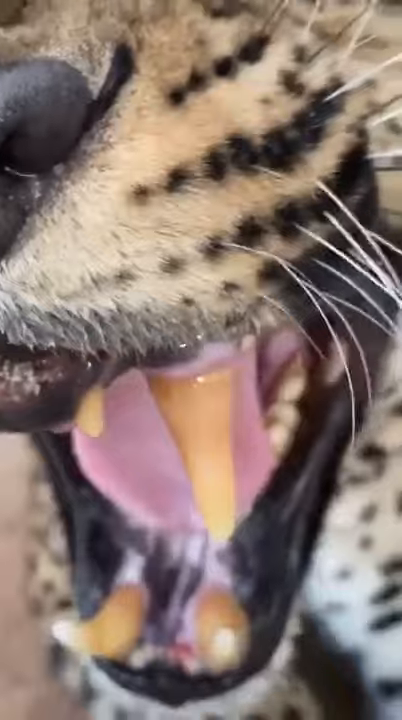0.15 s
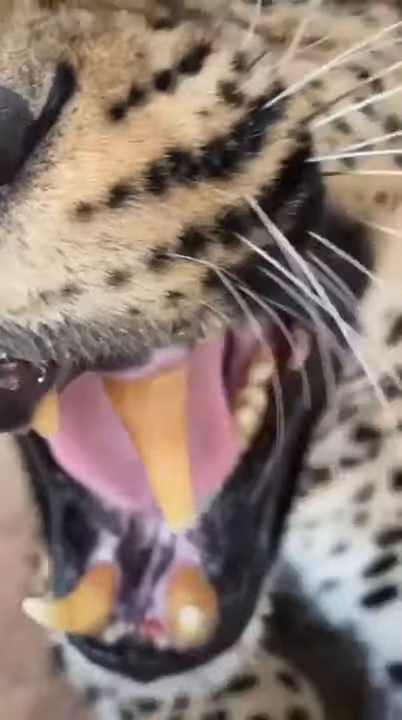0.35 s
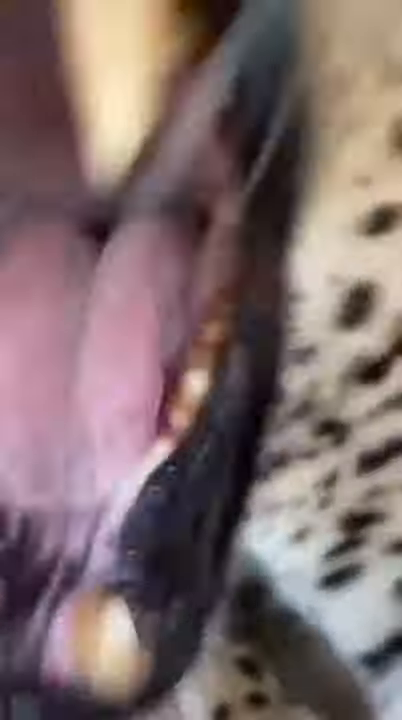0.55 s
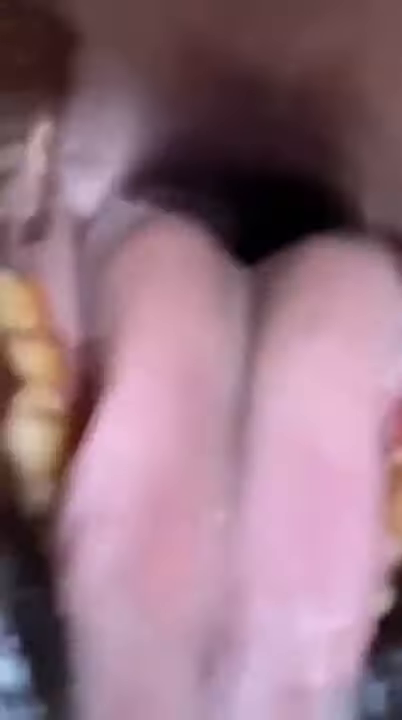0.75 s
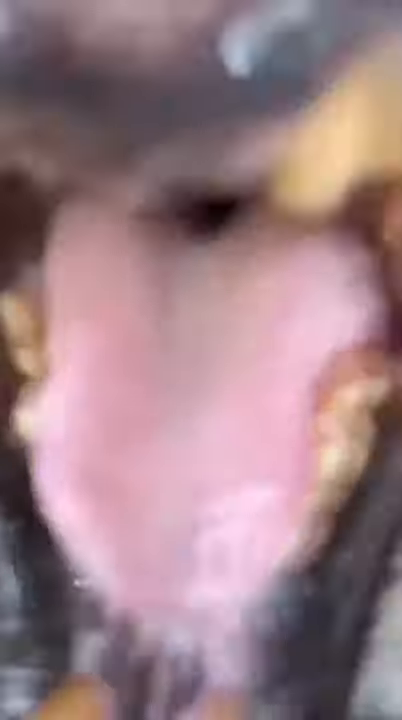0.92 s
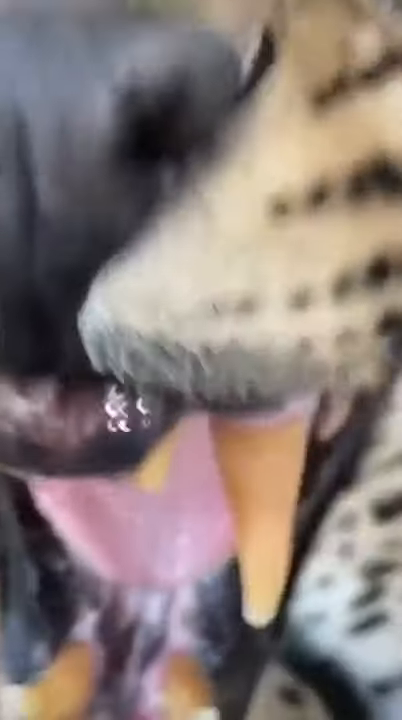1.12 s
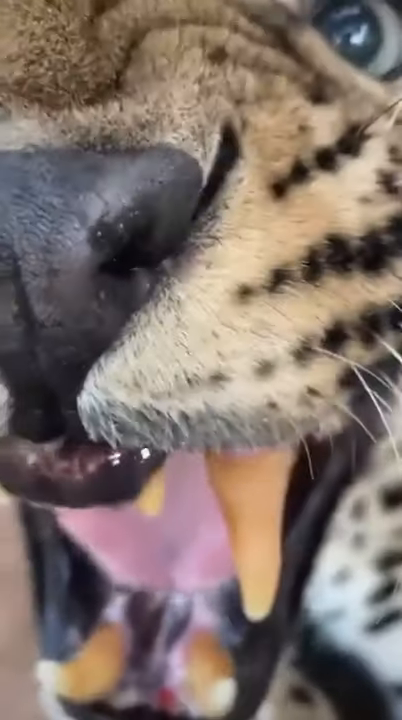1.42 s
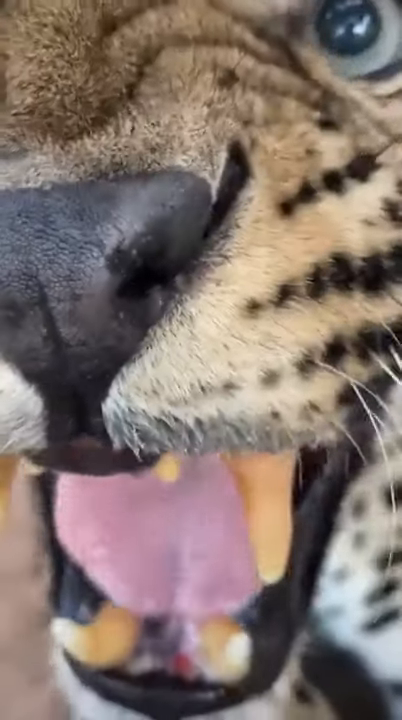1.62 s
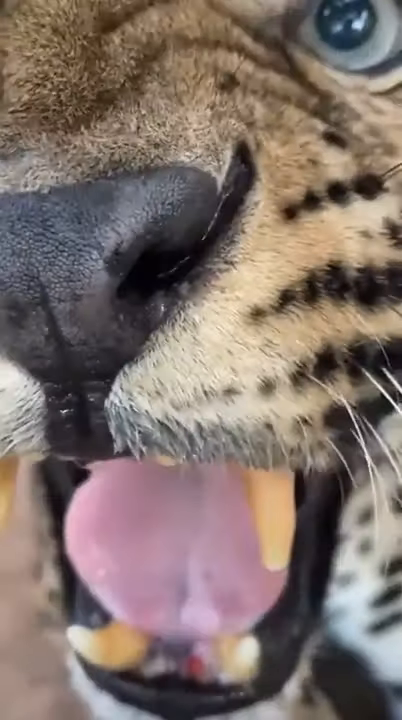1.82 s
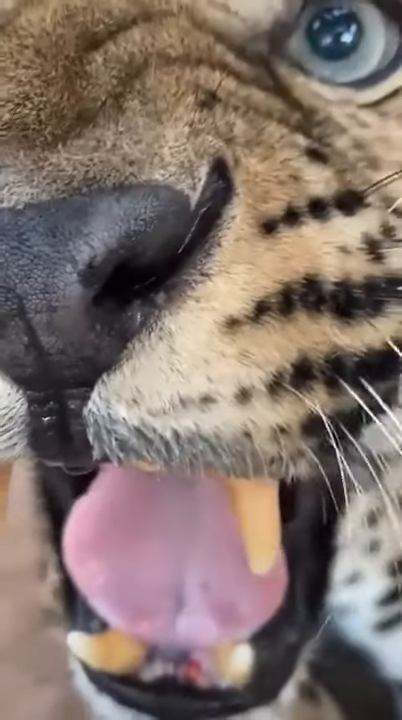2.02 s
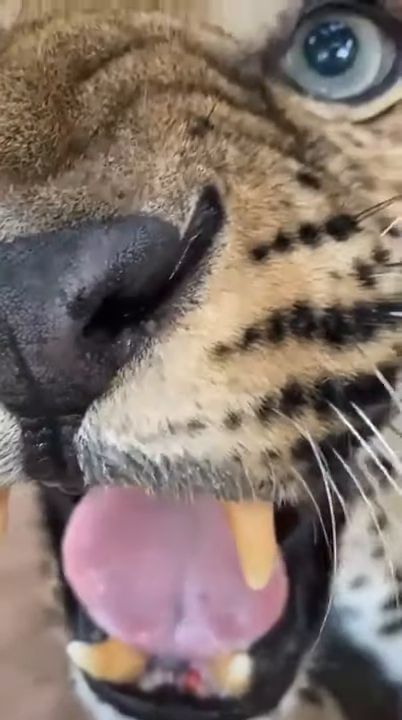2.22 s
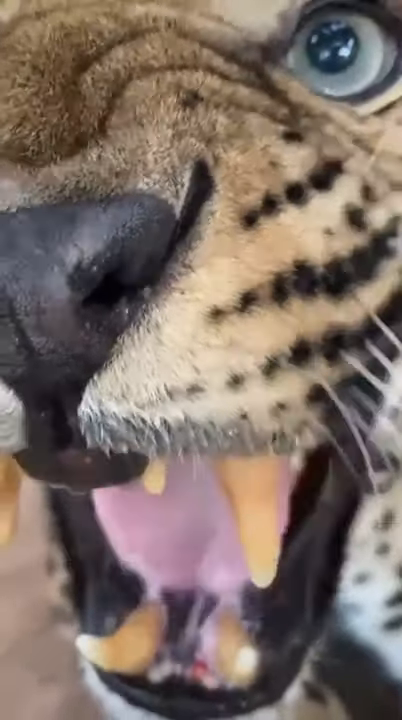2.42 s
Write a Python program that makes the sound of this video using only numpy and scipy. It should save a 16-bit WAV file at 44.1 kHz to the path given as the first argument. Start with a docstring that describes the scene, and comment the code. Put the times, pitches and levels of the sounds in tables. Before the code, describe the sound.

A leopard growls in a low, fluttering rumble right by the microphone, then bursts into a loud, hissing snarl. The growl fades, and the cat draws a wet, rasping breath before growling softly again in still air.

```python
"""A leopard growls close by, bursts into a snarling roar, sinks back, rasps on the in-draw, growls again.
Its slack vocal folds flap 14-45 times a second: each flap thumps the chest, rings the throat and slaps a
puff of turbulent air into the mouth resonances, while air hisses past the teeth. Indrawn air rushes and
gargles, saliva crackles. Faint reflections and still air lie behind."""
import sys
import numpy as np
from scipy import signal
from scipy.fft import rfft, irfft
from scipy.io import wavfile
from scipy.ndimage import uniform_filter1d

SR = 44100
rng = np.random.default_rng(int(sys.argv[2]) if len(sys.argv) > 2 else 0)


def put_to_file(sound):
    """Save the sound as 16-bit audio at rate SR, in the file named by the first command-line argument."""
    columns = np.atleast_2d(sound).T  # one column per channel
    safe = np.clip(columns, -1, 1)
    whole_steps = np.round(safe * 32767)
    wavfile.write(sys.argv[1], SR, whole_steps.astype(np.int16))


N = 112454

# still air spectrum: f/Hz, level/dB
FLOOR = [(25, -15), (90, 2.5), (280, 4), (400, -27.5), (700, -25), (1300, -30), (2500, -41), (12000, -56)]
# clearest saliva pops: t/s, level/dB
SALIVA_POPS = [(1.72, -27), (1.844, -18), (1.888, -16), (1.902, -15), (1.945, -17), (2.023, -19),
               (2.036, -20), (2.271, -21)]
# saliva resonances: f/Hz
SALIVA_HZ = [700, 1300, 1700, 3400, 4500, 5600, 7800]
# in-draw envelope: t/s, level/dB
DRAW_LEVEL = [(1.712, -84), (1.721, -41), (1.801, -38), (1.9, -33.5), (2.1, -37), (2.299, -41.5),
              (2.336, -54.5), (2.359, -91)]
# in-draw spectrum: f/Hz, level/dB
DRAW_SPECTRUM = [(30, -23.5), (65, 4.5), (110, 8.5), (210, -3), (310, -11), (430, -13), (600, -34),
                 (850, -31.5), (1250, -18), (2000, -30), (4000, -39), (10000, -44)]
# teeth hiss spectrum: f/Hz, level/dB
HISS_SPECTRUM = [(1500, -4), (3500, -3.5), (4500, 1), (5100, 2.5), (6500, 3.5), (9000, 0.5), (10500, -9.5),
                 (12000, -9), (12900, -3.5), (14000, -50)]
# brief pitched sounds (squeals, soft throat notes, a ringing saliva pop): t/s, f/Hz, level/dB, half-length/s
BRIEF_TONES = [(0.405, 4480, -48.5, 0.0055), (.628, 488, -19, 0.0032), (0.642, 464, -21.5, 0.0037),
               (2.511, 1596, -55.5, 0.0059), (0.593, 1222, -25, 0.0035), (.602, 2080, -26.5, 0.0022),
               (.606, 1167, -22.5, 0.0032), (0.652, 1202, -21, 0.0047), (0.672, 1350, -24, 0.0024),
               (1.891, 440, -32, 0.0032), (1.888, 1600, -41, 0.0025), (2.391, 268, -41.5, 0.0057),
               (2.411, 250, -46.5, 0.0061), (2.478, 176, -41, 0.0064), (2.516, 152, -38, 0.0068)]
# vocal fold flap rate: t/s, f/Hz
FLAP_HZ = [(0.0, 28.58), (0.1, 29.03), (0.35, 29.06), (0.48, 31.76), (0.57, 45.28), (0.76, 44.04),
           (1.0, 33.17), (1.16, 29.04), (1.36, 28.05), (1.5, 24.68), (1.68, 13.57), (1.76, 24.73),
           (1.87, 22.92), (2.01, 28.51), (2.1, 22.47), (2.21, 27.51), (2.36, 19.77), (2.52, 28.87)]
# voice strength before each layer's gain: t/s, chest/dB, throat/dB, mouth/dB, hiss/dB
EFFORT_OUT = [(0, -33, -45.5, -47, -56), (0.1, -34.5, -49.5, -59.5, -54), (0.2, -31, -41, -48.5, -49.5),
              (0.44, -30, -41.5, -48, -51), (0.52, -27, -32, -32.5, -44), (0.57, -24.5, -21, -27, -24.5),
              (0.61, -20.5, -12.5, -28.5, -44), (0.67, -27, -13.5, -34.5, -25.5),
              (0.77, -19.5, -12.5, -30, -27.5), (0.83, -23, -23.5, -38.5, -29),
              (0.88, -28.5, -30.5, -34.5, -32), (0.98, -26, -31.5, -40, -38),
              (1.15, -34.5, -41.5, -47.5, -55.5), (1.38, -35.5, -41, -51, -56),
              (1.55, -46, -43, -53, -65.5), (1.61, -64, -66, -89, -95), (1.7, -74, -61.5, -63, -99)]
EFFORT_IN = [(1.708, -62, -70, -78, -66), (1.734, -53, -81, -49, -45), (1.78, -42, -46, -46.5, -43.5),
             (1.828, -38.5, -37, -43, -47.5), (1.92, -31, -32.5, -42.5, -45), (2.079, -33, -37, -45, -48),
             (2.22, -37.5, -34.5, -46, -49.5), (2.31, -31, -40, -52.5, -50), (2.36, -61, -98, -108, -61.5)]
EFFORT_LAST = [(2.37, -46.5, -64, -99, -105), (2.45, -49.5, -52, -72, -73), (2.55, -43, -48, -73.5, -76)]
EFFORT = EFFORT_OUT + EFFORT_IN + EFFORT_LAST
# accented flaps: t/s, gain/dB
ACCENTS = [(.033, 7.5), (.173, 3), (.31, 8.5), (.443, 5), (.507, 1.5), (.601, 5), (.646, 9), (.668, -5),
           (.713, 7), (.735, 7), (.758, 6.5), (.78, -0.5), (.906, 6), (.991, 8.5), (1.051, 8.5),
           (1.116, 5.5), (1.435, 9), (1.22, 2.5), (1.473, 0), (1.901, -1), (2.505, 12.5)]
# chest swing per flap: t/s, f/Hz, delay/s, half-length/s
CHEST_SWING = [(.45, 95.5, 0.019, 0.0087), (.56, 148, 0.0093, 0.0085), (.8, 132, 0.0068, 0.0025),
               (.97, 114.6, 0.0096, 0.011), (1.15, 102.6, 0.011, 0.011), (1.6, 97, 0.015, 0.0073),
               (1.75, 93, -0.0071, 0.0086), (2.32, 92.4, -0.0058, 0.0063), (2.4, 89.3, 0.0096, 0.0063)]
# hollow knock per indrawn flap: f/Hz, gain/dB, half-length/s
KNOCK = [(210, 2, 0.0037), (406, -7, 0.0033)]
# lowest throat resonance: t/s, f/Hz, decay/s
THROAT_MODE = [(0, 270, .004), (.5, 260, .004), (.61, 275, .006), (.67, 390, .007), (.8, 378, .007),
               (.98, 325, .0055), (1.4, 270, .004), (1.65, 260, .007), (1.9, 255, .0042), (2.3, 240, .0042),
               (2.4, 280, .011), (2.55, 260, .007)]
# lips draw back, shortening the mouth: t/s, factor on growl resonances
LIP_FACTOR = [(0, .985), (.38, 1.025), (.52, 1.11), (.88, .99), (1.05, 1.02), (1.25, 1.16), (1.55, 1.28),
              (2.4, 1.0)]
# growl mouth resonances: f/Hz, width/Hz, level/dB, exponent on lip factor
GROWL_MODES = [(604, 49, -4, 0.47), (1180, 84, -7, 0.25), (1574, 34, 7.5, 0.84), (2851, 46, 2, 0.38),
               (3593, 160, -13, 0.23), (4394, 158, -8.5, 0.25), (5850, 150, -18.5, 0.93)]
# mouth resonances at roar onset, jaws wide, in-draw: f/Hz, width/Hz, level/dB
BARK_MODES = [(508, 170, 6.5), (810, 380, -12.5), (1172, 130, 2.5), (1844, 36, 1.5), (2035, 220, 0),
              (2520, 630, -7), (3560, 600, 1.5), (4440, 190, -8), (5350, 150, -5), (6310, 390, -6)]
ROAR_MODES = [(550, 120, 1), (751, 115, 2.5), (1128, 72, 1.5), (1733, 87, 3), (2830, 59, -9),
              (3450, 160, -1), (4170, 100, -0.5), (5040, 89, -10), (6400, 560, -10)]
RASP_MODES = [(415, 77, 13.5), (640, 160, 3), (1107, 140, 2.5), (1687, 69, 1.5), (2376, 74, -2),
              (3580, 450, -9.5), (4100, 180, -39), (5820, 450, -13)]
# voice manners; click: relative to the puff, rough: throat turbulence relative to the ring
GROWL = dict(gain_db=-7, puff_s=.004, leak_db=-24, click=.3, uneven_db=1.5, side_db=-15,
             rough=.25, rebound_db=-16)
BARK = dict(gain_db=-1, puff_s=.0035, leak_db=-15, click=.2, uneven_db=1, side_db=-12,
            rough=.45, rebound_db=-10)
ROAR = dict(gain_db=-2, puff_s=.002, leak_db=-24, click=.2, uneven_db=1, side_db=-11,
            rough=.15, rebound_db=-22)
RASP = dict(puff_s=.003, leak_db=-9, click=.1, uneven_db=3, side_db=-20)

BARK_S, ROAR_S, RASP_S = (.565, .68), (.68, .868), (1.71, 2.36)
SCENE_T_S, FLAP_T_S = np.arange(N) / SR, np.arange(4096) / SR


def from_db(db):
    """Decibels to gain."""
    return 10 ** (np.asarray(db) / 20)


def unit(x):
    """Scale to unit energy."""
    return x / np.sqrt(np.sum(x ** 2) + 1e-20)


def at(rows, s):
    """Table columns interpolated at time s."""
    times, *columns = np.transpose(rows)
    return [np.interp(s, times, c) for c in columns]


def add(out, s, sound):
    """Mix into stereo at time s."""
    i, sound = max(0, int(s * SR)), sound[..., max(0, -int(s * SR)):]
    part = out[:, i:i + sound.shape[-1]]
    part += sound[..., :part.shape[-1]]


def stereo(mid, side):
    """Mid/side to left/right."""
    return np.array([mid + side, mid - side])


def resonate(x, hz, width_hz):
    """Two-pole resonance, unit peak gain."""
    r = np.exp(-np.pi * width_hz / SR)
    feedback = [1, -2 * r * np.cos(2 * np.pi * hz / SR), r * r]
    return signal.lfilter(np.array([1, 0, -1]) * (1 - r * r) / 2, feedback, x)


def noise(spectrum):
    """Coloured noise, unit rms."""
    hz, db = np.transpose(spectrum)
    bins_hz = np.arange(N // 2 + 1) * SR / N + 1
    gain = from_db(np.interp(np.log(bins_hz), np.log(hz), db))
    return unit(irfft(rfft(rng.standard_normal(N)) * gain, N)) * np.sqrt(N)


def flutter(depth_db):
    """Random gain swings of turbulent flow."""
    return from_db(depth_db * noise([(150, 16), (600, -44.5), (2000, -87)]))


def scattered(hz):
    """Random pitch spread, 3.5 % rms."""
    return hz * (1 + .035 * rng.standard_normal())


def swell(s, db, hz, half_s, glide_per_s=0):
    """Start time and samples of a Gaussian tone burst peaking at s."""
    t = FLAP_T_S - FLAP_T_S.mean()
    turns = np.cumsum(hz * np.exp(glide_per_s * t)) / SR
    tone = np.cos(2 * np.pi * (turns - turns[len(t) // 2]))
    return s + t[0], from_db(db) * unit(np.exp(-.5 * (t / half_s) ** 2) * tone)


def still_air(level_db=-51.5):
    """Steady low background noise."""
    return from_db(level_db) * noise(FLOOR)


def reflections(x, gain_db=-12.5, decay_s=.038):
    """Short diffuse tail from ground and enclosure."""
    t = np.arange(SR // 4) / SR
    tail = unit(rng.standard_normal(len(t)) * np.sqrt(t) * np.exp(-t / decay_s))
    return from_db(gain_db) * signal.fftconvolve(x.mean(axis=0), tail)[:N]


def saliva(rate_hz=110, small_db=-27.5, decay_s=.0057):
    """Wet pops, each with its own colour; the small ones follow the in-draw level."""
    start, end = RASP_S
    peak_db = max(db for _, db in DRAW_LEVEL)
    pops = list(SALIVA_POPS)
    for position, softness in rng.random((int(rate_hz * (end - start)), 2)):
        s = start + position * (end - start)
        pops.append((s, small_db - 10 * softness + at(DRAW_LEVEL, s)[0] - peak_db))
    out = np.zeros((2, N))
    for s, db in pops:
        burst = rng.standard_normal(len(FLAP_T_S)) * np.exp(-FLAP_T_S / decay_s)
        pop = sum(rng.standard_normal() * resonate(burst, hz, width_hz=350) for hz in SALIVA_HZ)
        add(out, s, from_db(db) * unit(pop))
    return out


def in_draw():
    """Air rushing in over the tongue."""
    return from_db(at(DRAW_LEVEL, SCENE_T_S)[0]) * flutter(depth_db=4) * noise(DRAW_SPECTRUM)


def gargle(rate_hz=120):
    """Indrawn air breaks through the wet throat: uneven puffs, shifting resonances."""
    out, gap_s = np.zeros((2, N)), 1 / rate_hz
    for s in np.arange(*RASP_S, gap_s):
        db = at(EFFORT, s)[2] + RASP["uneven_db"] * rng.standard_normal()
        modes = [(scattered(hz), width, level) for hz, width, level in RASP_MODES]
        add(out, s + gap_s * rng.random(), np.sqrt(gap_s * SR) * slap(gap_s, db, modes, RASP))
    return out


def hiss(flaps, gain_db=-11, side_db=-8.5, puff_s=.007, leak_db=-3.5):
    """Air past the teeth: a spurt per flap over a leak that is weaker on the in-draw."""
    t = SCENE_T_S
    last = np.searchsorted(flaps, t, side="right") - 1
    force = from_db([accent_db(s, 1 / at(FLAP_HZ, s)[0]) for s in flaps])
    spurts = force[last] * np.exp((flaps[last] - t) / puff_s)
    leak = from_db(np.where((t > RASP_S[0]) & (t < RASP_S[1]), RASP["leak_db"], leak_db))
    flow = (spurts + leak) * flutter(depth_db=2.5)
    flow /= np.sqrt(uniform_filter1d(flow ** 2, size=6000))
    air = stereo(noise(HISS_SPECTRUM), from_db(side_db) * noise(HISS_SPECTRUM))
    return from_db(at(EFFORT, t)[-1] + gain_db) * flow * air


def brief_tones():
    """Brief pitched sounds: squeals, soft throat notes and a ringing saliva pop."""
    out = np.zeros((2, N))
    for s, hz, db, half_s in BRIEF_TONES:
        add(out, *swell(s, db + 10 * np.log10(2 * half_s * SR), hz, half_s))
    return out


def flap_times(jitter_s=.0004):
    """One flap per fold cycle, slightly uneven."""
    turns = np.cumsum(at(FLAP_HZ, SCENE_T_S)[0]) / SR
    s = np.flatnonzero(np.diff(np.floor(turns))) / SR
    return np.r_[0, s + jitter_s * rng.standard_normal(len(s))]


def accent_db(s, period_s):
    """Sum of accents within half a cycle of s."""
    return sum(db for when, db in ACCENTS if abs(when - s) < period_s / 2)


def chest(s, db, gain_db=-.5, glide_per_s=-28):
    """Start time and samples of a chest thump; pitch falls if it lags the flap, rises if it leads."""
    hz, delay_s, half_s = at(CHEST_SWING, s)
    return swell(s + delay_s, db + gain_db, scattered(hz), half_s, glide_per_s * np.sign(delay_s))


def throat(s, db, rough, gain_db=-4, attack_s=.0021, sag_hz_per_s=130):
    """Short ring, sagging as the folds close, roughened by turbulence."""
    t = FLAP_T_S
    hz, decay_s = at(THROAT_MODE, s)
    envelope = (1 - np.exp(-t / attack_s)) * np.exp(-t / decay_s)
    ring = -np.sin(2 * np.pi * (scattered(hz) - sag_hz_per_s * (t / 2 - decay_s)) * t)
    churn = resonate(rng.standard_normal(len(t)), hz, width_hz=hz)
    return from_db(db + gain_db) * unit(unit(envelope * ring) + rough * unit(envelope * churn))


def mouth_shape(s):
    """Mouth resonances and voice manner at time s."""
    phases = (BARK_S, BARK_MODES, BARK), (ROAR_S, ROAR_MODES, ROAR), (RASP_S, RASP_MODES, RASP)
    for (start, end), modes, manner in phases:
        if start < s <= end:
            return modes, manner
    lips, = at(LIP_FACTOR, s)
    return [(hz * lips ** follow, width, db) for hz, width, db, follow in GROWL_MODES], GROWL


def slap(leak_s, db, modes, manner, attack_s=.0004, scatter_db=2.5, detune=.011):
    """Click, air puff and leak through the resonances of a mouth that never holds still."""
    t = FLAP_T_S
    puff = (1 - np.exp(-t / attack_s)) * np.exp(-t / manner["puff_s"])
    flow = puff + from_db(manner["leak_db"]) * (t < leak_s)
    air = unit(flow) * rng.standard_normal((2, len(t)))
    air[0] += manner["click"] * signal.unit_impulse(len(t), int(2 * attack_s * SR))
    mouth = np.zeros_like(air)
    for k, (hz, width_hz, level_db) in enumerate(modes):
        gain = (-1) ** k * from_db(level_db + rng.normal(0, scatter_db))
        mouth += gain * resonate(air, hz * rng.normal(1, detune), width_hz)
    mid, side = mouth
    return from_db(db) * stereo(unit(mid), from_db(manner["side_db"]) * unit(np.diff(side, prepend=0)))


def vocal_folds(flaps, slap_lead_s=.0017, knock_delay_s=.003, inward_slap_db=-4):
    """Each flap thumps chest and slaps mouth; outward it rings the throat and rebounds, inward knocks."""
    out = np.zeros((2, N))
    periods_s = np.diff(flaps, append=2 * flaps[-1] - flaps[-2])
    for s, period_s in zip(flaps, periods_s):
        # power to energy per flap
        chest_db, throat_db, mouth_db, _ = at(EFFORT, s) + 10 * np.log10(period_s * SR)
        modes, manner = mouth_shape(s)
        extra_db = accent_db(s, period_s)
        add(out, *chest(s, chest_db))
        if manner is RASP:
            for hz, db, half_s in KNOCK:
                add(out, *swell(s + knock_delay_s, throat_db + db, scattered(hz), half_s))
            add(out, s, slap(0, mouth_db + extra_db + inward_slap_db, modes, manner))
            continue
        mouth_db += manner["gain_db"] + manner["uneven_db"] * rng.standard_normal()
        add(out, s - slap_lead_s, slap(period_s, mouth_db + extra_db, modes, manner))
        add(out, s, throat(s, throat_db, manner["rough"]))
        # folds touch again near mid-cycle
        rebound = throat(s, throat_db, manner["rough"]) + slap(0, mouth_db, modes, manner)
        add(out, s + period_s * rng.uniform(.41, .58), from_db(manner["rebound_db"]) * rebound)
    return out


def scene():
    """Leopard, reflections, still air."""
    flaps = flap_times()
    leopard = vocal_folds(flaps) + brief_tones() + hiss(flaps) + in_draw() + gargle() + saliva()
    return leopard + reflections(leopard) + still_air()


def record(dry):
    """Soft clip, then steep low-pass."""
    ceiling, cutoff_hz = .32, 13600
    lowpass = signal.ellip(10, .3, 80, cutoff_hz, fs=SR, output="sos")
    return signal.sosfilt(lowpass, ceiling * np.tanh(dry / ceiling))


dry = scene()
out = record(dry)
put_to_file(out)
```